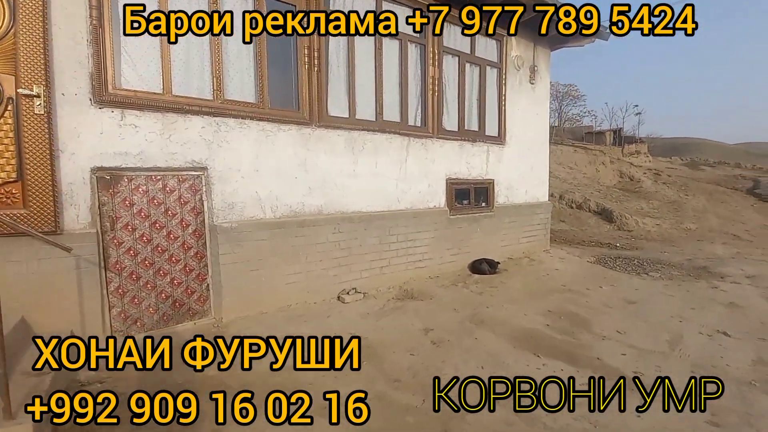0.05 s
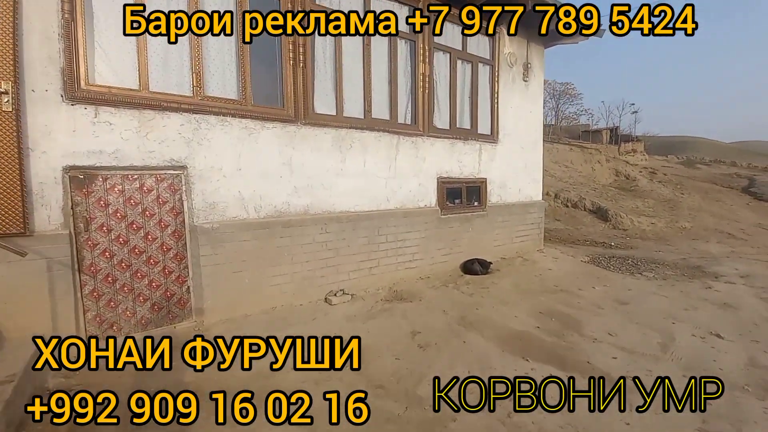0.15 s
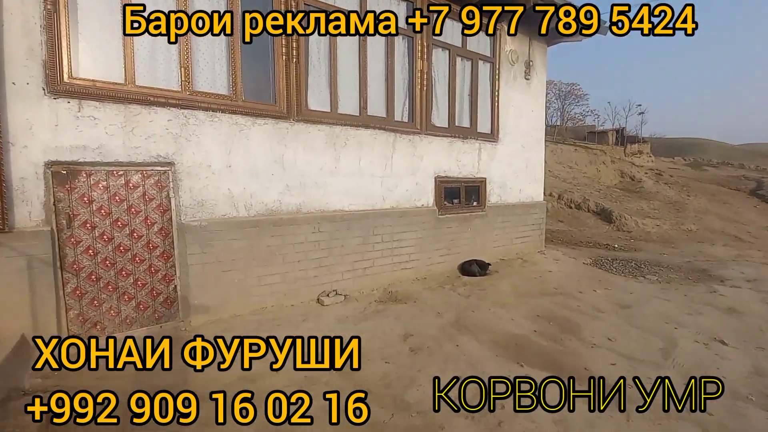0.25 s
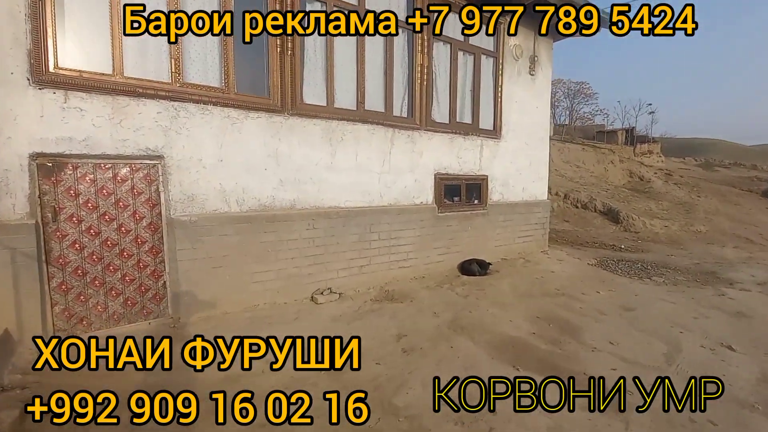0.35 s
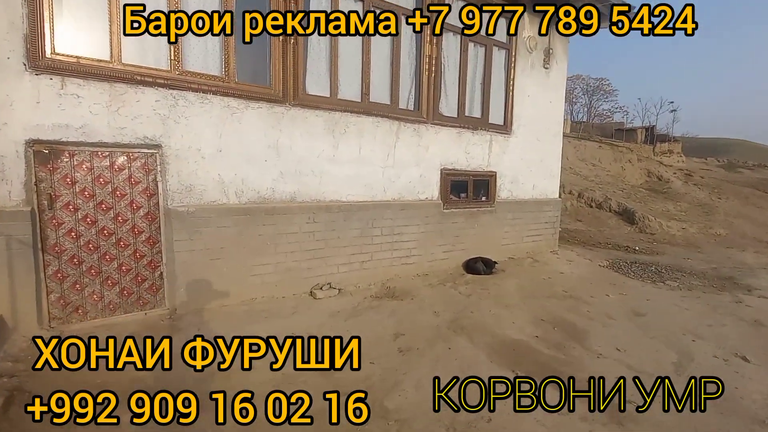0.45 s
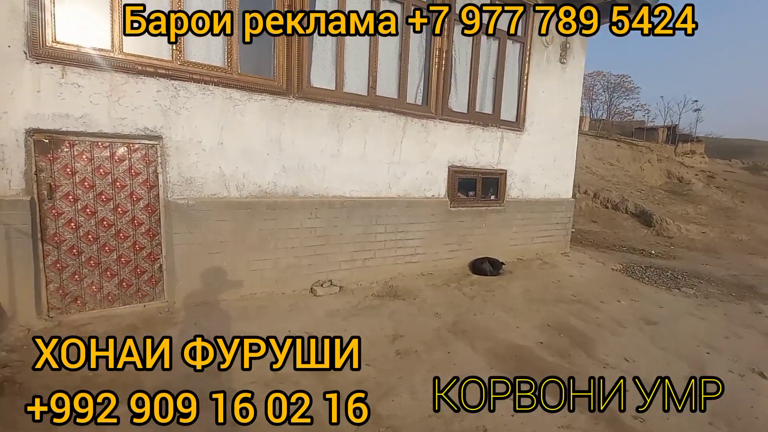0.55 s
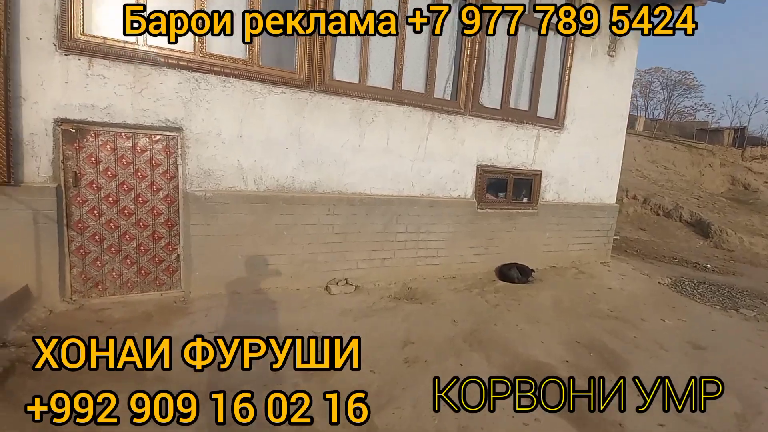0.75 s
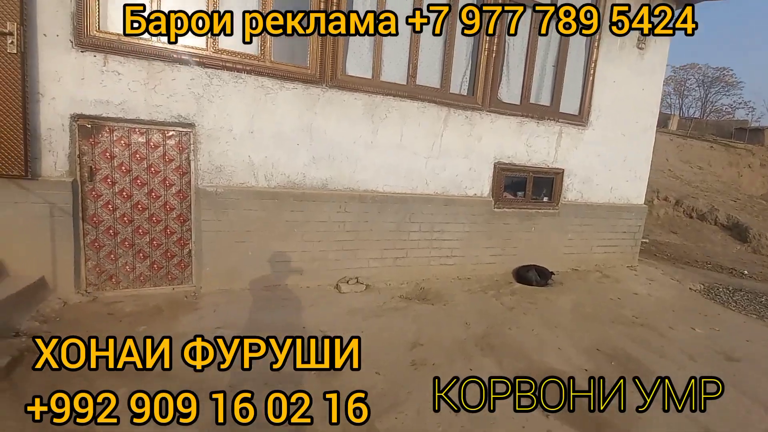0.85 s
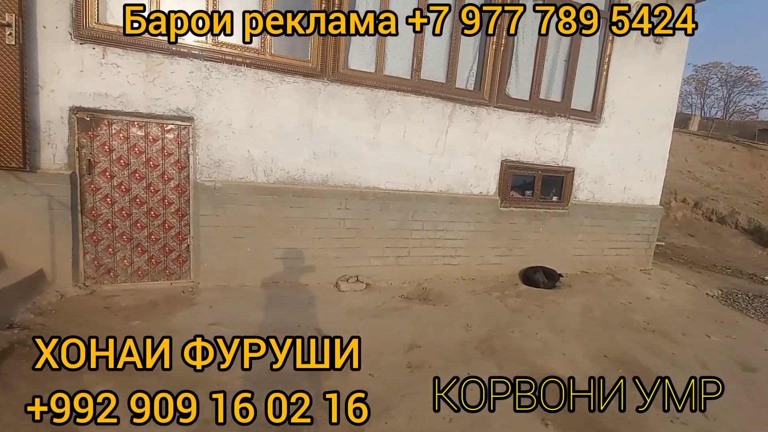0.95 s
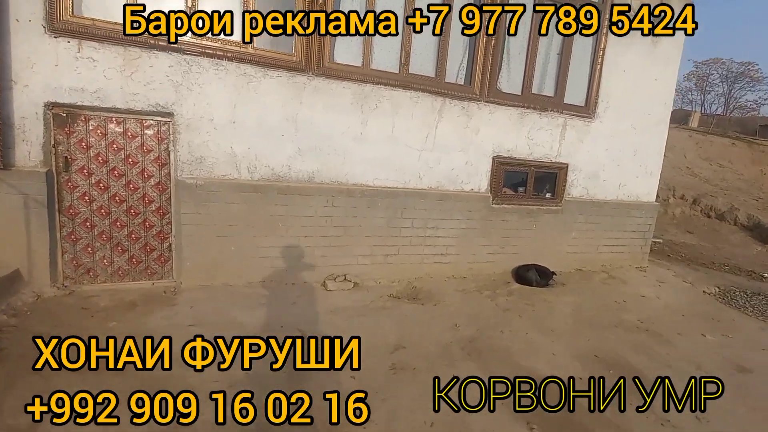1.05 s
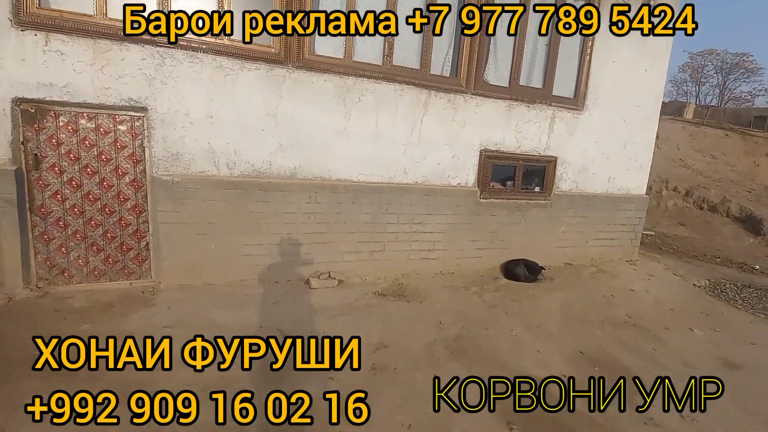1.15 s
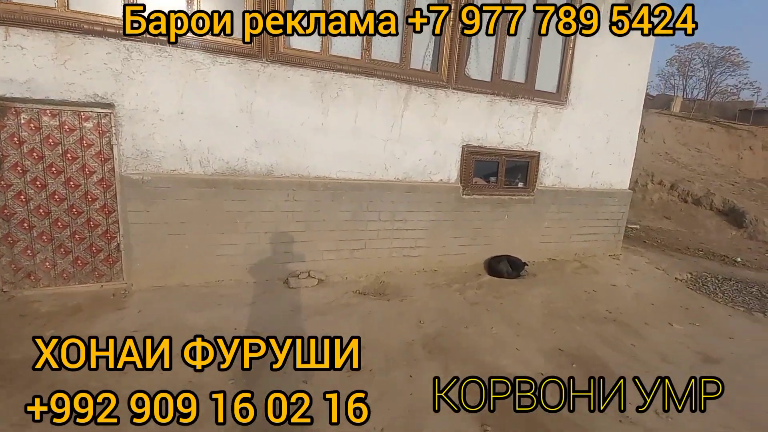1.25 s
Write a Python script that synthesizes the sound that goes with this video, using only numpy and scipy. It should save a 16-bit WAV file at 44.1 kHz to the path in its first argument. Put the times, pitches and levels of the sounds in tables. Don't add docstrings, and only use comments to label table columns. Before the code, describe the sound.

Slow footsteps on packed dirt, close below a handheld stereo microphone: a knocking step at a third of a second, then a softer gritty scuff near nine tenths, with low wind thuds mostly on the left.

```python
import sys
import numpy as np
from scipy import signal
from scipy.fft import rfft, irfft
from scipy.io import wavfile
from scipy.ndimage import uniform_filter1d

SR = 44100
rng = np.random.default_rng(int(sys.argv[2]) if len(sys.argv) > 2 else 0)


def materialize(psi):
    bounded = np.clip(np.atleast_2d(psi).T, -1, 1)
    quanta = np.round(bounded * 32767).astype(np.int16)
    wavfile.write(sys.argv[1], SR, quanta)


def makeup_ratio(level_db):
    decades = np.asarray(level_db, float) / 20
    return 10 ** decades


N = 57330

# time_s, level_db, hollowness_db, sharpness_db
DRAG = [(0, -74.5, -3, -4), (.1, -70, -1, -7), (.2, -64.5, 0, -3.5), (.3, -68, -4.2, -2),
        (.314, -65.5, 3, -1), (.34, -69, 0, 0.5), (.44, -62, 0, -4), (.5, -68.5, 1.5, -3.5),
        (.56, -73, 1.2, -18), (.63, -67.5, -5.5, -10.5), (.74, -70.5, -8, -20), (.8, -62.5, -3.5, -7.5),
        (.87, -57.5, -4, -10), (.935, -55, 1.5, -7), (.968, -61.5, 6.2, -9), (.99, -69, 3, -1.5),
        (1.12, -70.5, -2, -1), (1.3, -67.5, 0, -4.5)]
# time_s, level_db, fineness_db
SAND = [(0.0, -86.5, 6.5), (0.148, -79.5, -2.5), (0.306, -79.5, -0.5), (0.31, -75, -3.5), (0.382, -80, 0),
        (0.444, -76.5, 1.5), (0.68, -83.5, -4.5), (0.716, -79, -3), (0.738, -87.5, 1.5), (0.854, -76, 2.5),
        (0.908, -76, 2.5), (0.93, -68.5, 0.5), (0.984, -79.5, 6), (1.1, -75.5, -1.5), (1.114, -80, -0.5),
        (1.3, -82.5, -5.5)]
# pitch_hz, width_hz, level_db, growth_db_per_db of drag, left_over_right_db
SOLE = [(1209.4, 140, -10, 0.53, 3), (1326, 255, 0.5, 1.3, 3.5), (769, 320, -12, 1.79, 0),
        (933, 210, -18, 0.27, 1)]
EDGE = [(1593, 194, -4, 0.84, 10), (1763, 330, -3.5, 1, 14.5)]
HOLLOW = [(280, 101, -6.5, 0.71, 0), (592.5, 159, -5.5, 0.78, 1.5)]
GRIT = [(6080, 1660, 1, 1.13, 2), (3350, 560, -20.5, 1.24, 0.5)]
DUST = [(12230, 1500, -10, 0.81, 3), (13500, 7000, -5.5, 1.14, -5)]
# start_s, peak_db, left_over_right_db, hardness_db_per_octave, ring_length (0-2)
HEELS = [
    (0.3109, -40, 3.5, 0, 0.72),
    (0.3612, -39, 11.5, -2, .45),
    (0.411, -56.5, 5, 9, 0.87),
    (0.441, -44.5, 11, 1.5, .8),
    (0.504, -54.5, 4, -11, 0.38),
    (0.901, -48.5, -5, 5, 0.3),
    (0.931, -48.5, 8, 3.5, 1),
    (1.186, -56, 6.5, 1.5, 0.72),
]
# pitch_hz, level_db, t60_s
GROUND = [(199, 6, 0.061), (299, -1.5, 0.042), (518, -6.5, 0.059), (1770, -30, 0.06)]
# start_s, length_s, pitch_hz, peak_db, left_over_right_db
SQUEAKS = [(.2523, .002, 12100, -68, -8), (.2668, .004, 12000, -65, -9), (.298, .005, 12100, -72, -8),
           (.4225, .007, 12050, -67, 2), (.4437, .0092, 11935, -45, -6), (.465, .004, 12000, -63, 2),
           (.4705, .003, 12350, -60, 2), (.474, .005, 11950, -64, 3), (.756, .024, 12500, -74, -8),
           (.834, .011, 12000, -67, -9), (.872, .005, 12600, -71, 0), (1.0165, .004, 12600, -62, 0),
           (1.116, .012, 12550, -70, 0), (1.172, .006, 12500, -71, -6)]
# time_s, peak_db, pitch_hz, left_over_right_db
TICKS = [(.0149, -63, 12500, 6), (.2525, -66, 13000, -8), (.268, -62, 12500, -8), (.312, -62, 6500, 2),
         (.914, -62, 12800, -4), (.931, -54, 13000, -2), (.945, -60, 12200, -3), (.957, -64, 13500, 0),
         (1.0185, -56, 13200, -2), (1.0255, -56, 12800, 0), (1.0455, -59, 13800, -1),
         (1.162, -69, 13500, -4), (1.197, -70, 12500, -3)]
# middle_s, peak_db, pitch_hz, length (0-2)
EDDIES_LEFT = [(.045, -40, 76, 0.65), (.065, -41, 81, 1), (.086, -41, 81.5, 0.96), (.132, -36.5, 85, 0.69),
               (.156, -43.5, 70, 1), (.211, -35, 95, 0.93), (.324, -36.5, 87, 1), (.349, -32.5, 103, 0.75),
               (.369, -19.5, 102.8, 0.64), (.386, -30.5, 66.7, 1), (.404, -23, 97, 0.42),
               (.428, -23, 142, 0.54), (.458, -30.5, 113, 0.77), (.476, -34, 96, 0.58),
               (.51, -34.5, 84.5, 0.59), (.567, -41.5, 83, 0.65), (.626, -40, 117, 1),
               (.677, -45.5, 83, 0.97), (.705, -45, 76, 1), (.768, -41, 72, 0.47), (.816, -43, 91, 0.65),
               (.845, -40.5, 116, 0.99), (.881, -40, 74.5, 1), (.929, -36.5, 79, 0.69),
               (.964, -34.5, 81.5, 1), (1.006, -39.5, 115, 0.67), (1.045, -43, 90, 1),
               (1.079, -43.5, 106, 0.4), (1.15, -66, 79, .95), (1.225, -53.5, 85.6, 1),
               (.266, -46.5, 59.7, 0.86), (.008, -53.5, 59, 1), (1.024, -48, 62, 0.55),
               (.6, -46, 65.5, 0.49)]
# middle_s, peak_db, pitch_hz
EDDIES_RIGHT = [(.079, -46.5, 99), (.111, -51, 104), (.144, -45, 92), (.17, -43, 76), (.243, -43, 99),
                (.273, -51, 75), (.33, -46, 103), (.377, -47.5, 95), (.414, -45, 76), (.439, -53, 90),
                (.475, -39.5, 96), (.518, -50, 90), (.87, -72, 70), (1.05, -64, 80.5), (1.15, -64, 69.5)]
# time_s, left_db, right_db
BREEZE = [(0, -64.5, -79), (.08, -53, -57), (.28, -57.5, -66), (.33, -50, -60), (.42, -42.5, -68),
          (.52, -51, -55), (.56, -51.5, -60), (.72, -53.5, -69), (.8, -53.5, -68), (.93, -50, -60.5),
          (1.075, -52.5, -68), (1.1, -60.5, -74.5), (1.3, -62, -65)]
# middle_s, length_s, top_hz, peak_db, left_over_right_db
CHIRPS = [
    (.727, .09, 3055, -79, -15),
    (1.236, .07, 3020, -84, 4),
    (1.19, .04, 4200, -89, -8),
    (1.236, .035, 4020, -90, -8),
    (1.268, .04, 3950, -89, -8),
    (1.296, .03, 3880, -87, -8),
]
# pitch_hz, density_db_per_hz
AIR = [(150, -33), (250, -11), (450, -28.5), (1000, -16), (2400, -29.5), (4500, -32), (9000, -40),
       (15800, -32)]

TIME_S = np.arange(N) / SR
USUAL_DRAG_DB = -64


def unit(x):
    return x / np.sqrt(np.mean(x ** 2))


def peak_one(x):
    return x / np.abs(x).max(axis=1, keepdims=True)


def ring(x, hz, width_hz):
    b, a = signal.iirpeak(min(hz, .45 * SR), hz / width_hz, fs=SR)
    once = signal.lfilter(b, a, x)
    return signal.lfilter(b, a, once)


def walk(rate_hz):
    k = int(SR / rate_hz)
    held = np.repeat(rng.standard_normal(N // k + 1), k)
    return 3.0 * uniform_filter1d(uniform_filter1d(held, k), k)[:N]


def curve(table, index):
    rows = np.array(table)
    return np.interp(TIME_S, rows[:, 0], rows[:, index])


def sides(pan_db):
    return makeup_ratio(np.array([[pan_db / 2], [-pan_db / 2]]))


def grains():
    grains_per_s, spread_db = 8000, 1.4
    size = makeup_ratio(spread_db * rng.exponential(size=N)) * rng.standard_normal(N)
    return unit(size * (rng.random(N) < grains_per_s / SR))


def rubbed(body, drag_db):
    alike_below_hz, flicker_db = 1750, .5
    out, shared, own = 0, grains(), grains()
    for hz, width_hz, db, growth, pan_db in body:
        like = np.exp(-(hz / alike_below_hz) ** 2)
        pair = np.sqrt(1 + like) * shared + np.sqrt(1 - like) * own * np.array([[1], [-1]])
        level_db = db + USUAL_DRAG_DB + growth * (drag_db - USUAL_DRAG_DB)
        gain = makeup_ratio(level_db + flicker_db * walk(25.6))
        out = out + gain * sides(pan_db) * unit(ring(pair, hz, width_hz))
    return out


def scuffs():
    drag, hollowness, sharp = [curve(DRAG, index=i) for i in (1, 2, 3)]
    sand, fine = curve(SAND, index=1) + 14, curve(SAND, index=2)
    soles = makeup_ratio(-4.0) * rubbed(SOLE, drag) + makeup_ratio(sharp - 3.5) * rubbed(EDGE, drag)
    hollow = makeup_ratio(hollowness) * rubbed(HOLLOW, drag)
    loose = rubbed(GRIT, sand) + makeup_ratio(fine) * rubbed(DUST, sand)
    return soles + hollow + makeup_ratio(-12) * loose


def heels():
    contact_s, detune = 0.0017, 0.047
    out, chances = 0, rng.standard_normal((len(HEELS), len(GROUND)))
    for (s, db, pan_db, hard_db, ringing), chance in zip(HEELS, chances):
        t = np.maximum(TIME_S - s, 0)
        onset = 1 - np.exp(-(t / contact_s) ** 2)
        for (hz, mode_db, t60), c in zip(GROUND, chance):
            level_db = db + mode_db + hard_db * np.log2(hz / GROUND[1][0])
            fading = makeup_ratio(level_db - 60 * t / (t60 * max(ringing, .2)))
            tone = np.sin(2 * np.pi * hz * (1 + detune * c) * t)
            out = out + fading * tone * onset * sides(pan_db)
    return out


def squeaks():
    rise_s, t60_s, far_db = .0016, .008, -5
    out, rough = 0, makeup_ratio(2 * walk(590))
    lag_turns = np.array([[.24], [0]])
    under = makeup_ratio(-21) * unit(ring(rng.standard_normal((2, N)), hz=6360, width_hz=740))
    for s, length, hz, db, pan_db in SQUEAKS:
        tail_db = -60 * np.maximum(TIME_S - s - length, 0) / t60_s
        shape = np.clip((TIME_S - s) / rise_s, 0, 1) ** 2
        note = np.sin(2 * np.pi * (hz * TIME_S - lag_turns)) + under
        out = out + makeup_ratio(db + far_db + tail_db) * shape * rough * note * sides(pan_db)
    return out


def ticks():
    width_hz, burst_s, near_db = 6000, .00025, 0.5
    low_hz, low_db = 6300, -8 + 3.5
    out, noise = 0, rng.standard_normal((2, N))
    for s, db, hz, pan_db in TICKS:
        burst = noise * np.exp(-np.abs(TIME_S - s) / burst_s)
        high = peak_one(ring(burst, hz, width_hz))
        low = peak_one(ring(burst, low_hz, width_hz / 3))
        out = out + makeup_ratio(db + near_db) * (high + makeup_ratio(low_db) * low) * sides(pan_db)
    return out


def flutter(breeze_db):
    noise = rng.standard_normal((2, N))
    usual_db, growth = -51.5, .4
    flicker_db = 1.5 * walk(30.12)
    low = unit(ring(noise[0], hz=90, width_hz=80.4))
    high = unit(ring(noise[1], hz=185.7, width_hz=91))
    high_db = -11.5 + growth * (breeze_db - usual_db)
    return makeup_ratio(breeze_db + flicker_db) * (low + makeup_ratio(high_db) * high)


def wind(eddies, index):
    rise_cycles, fall_cycles, glide = 1, 1.9, -0.13
    overtone_ratio, overtone_db = 2.01, -15.5
    out = flutter(curve(BREEZE, index=index))
    for (s, db, hz, *length), turn in zip(eddies, rng.random((len(eddies), 2))):
        cycles = (TIME_S - s) * hz
        stretch = max(length[0], .3) if length else 1
        span = np.where(cycles < 0, rise_cycles, fall_cycles) * stretch
        shape = np.exp(-(cycles / span) ** 2)
        cycles = cycles + glide * cycles ** 2 / 2
        swing = np.cos(2 * np.pi * (cycles + turn[0]))
        overtone = makeup_ratio(overtone_db) * shape * np.cos(2 * np.pi * (overtone_ratio * cycles + turn[1]))
        out = out + makeup_ratio(db) * shape * (swing + overtone)
    return out


def bird():
    arch_hz, skew, peaked = 400, .3, 2.4
    out, wobble_hz, rough_db = 0, 12 * walk(160), 1.5 * walk(150)
    for s, length, hz, db, pan_db in CHIRPS:
        u = np.clip((TIME_S - s) / (length / 2), -1, 1)
        arch = arch_hz * (1 + skew * u) * (u * length / CHIRPS[0][1]) ** 2
        phase = np.cumsum(hz + wobble_hz - arch) / SR
        swell = (1 - u ** 2) * np.exp(-peaked * np.abs(u) ** 1.5 / 2)
        out = out + makeup_ratio(db + rough_db) * swell * np.sin(2 * np.pi * phase) * sides(pan_db)
    return out


def air():
    rows, hz = np.array(AIR), np.arange(N // 2 + 1) * SR / N + 1
    colour = makeup_ratio(np.interp(np.log(hz), np.log(rows[:, 0]), rows[:, 1]))
    hiss = irfft(rfft(rng.standard_normal((2, N))) * colour, N)
    return makeup_ratio(-74.5) * unit(hiss)


def scene():
    breeze = np.array([wind(EDDIES_LEFT, index=1), wind(EDDIES_RIGHT, index=2)])
    steps = scuffs() + heels() + squeaks() + ticks()
    return breeze + steps + bird() + air()


def band_limit(x):
    return signal.sosfilt(signal.butter(12, 16410, fs=SR, output="sos"), x)


def record(dry):
    bass_cut = signal.butter(2, 51, "high", fs=SR, output="sos")
    treble_cut = signal.ellip(10, .2, 60, 15740, fs=SR, output="sos")
    mix = signal.sosfilt(treble_cut, signal.sosfilt(bass_cut, dry))
    return band_limit(mix)


dry = scene()
out = record(dry)
materialize(out)
```